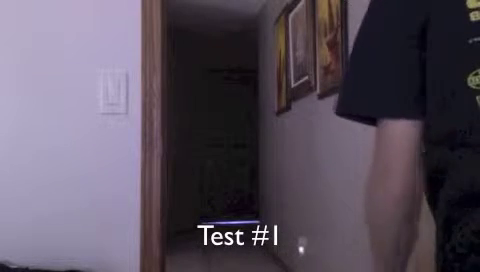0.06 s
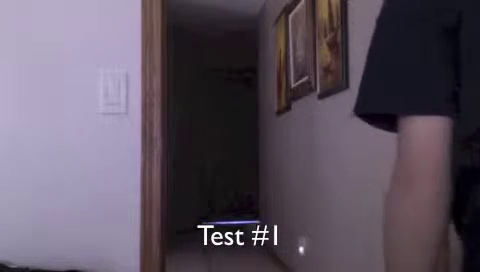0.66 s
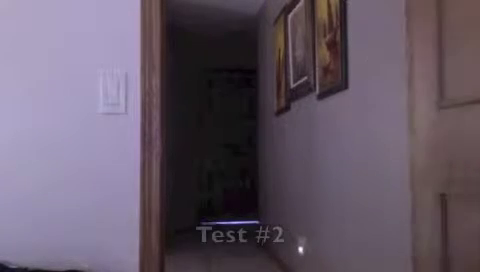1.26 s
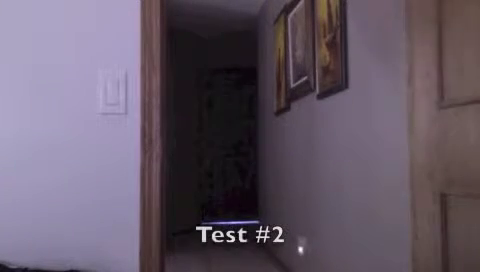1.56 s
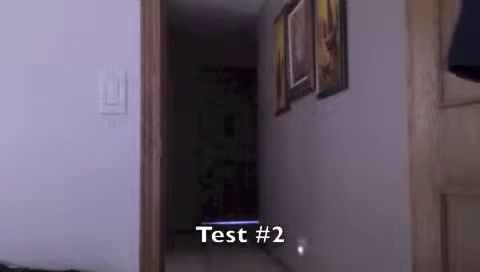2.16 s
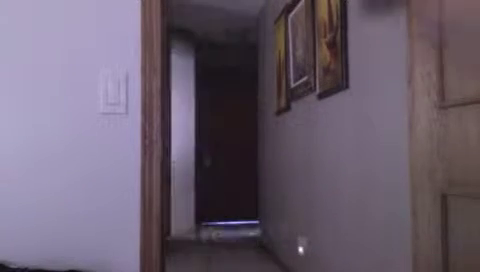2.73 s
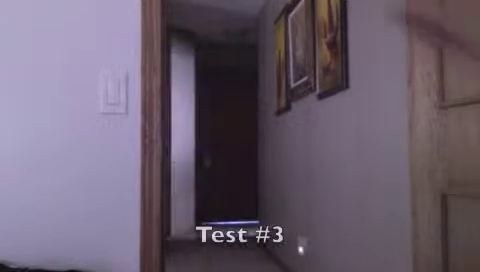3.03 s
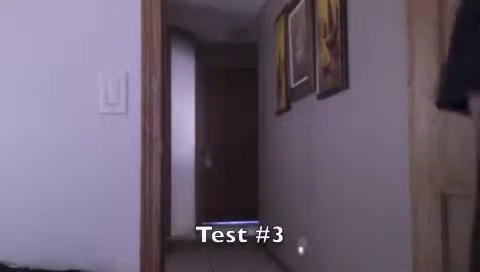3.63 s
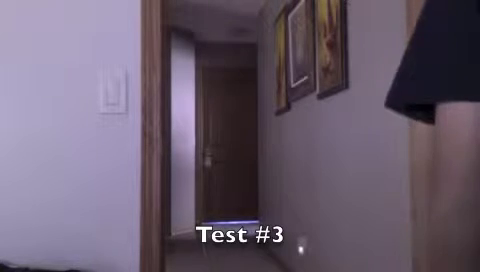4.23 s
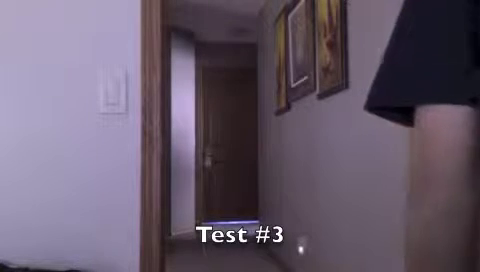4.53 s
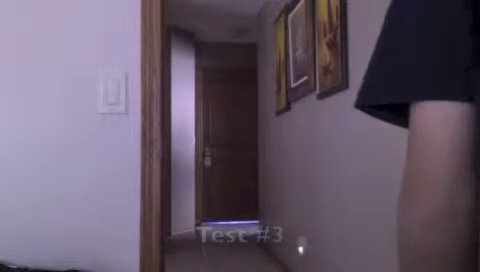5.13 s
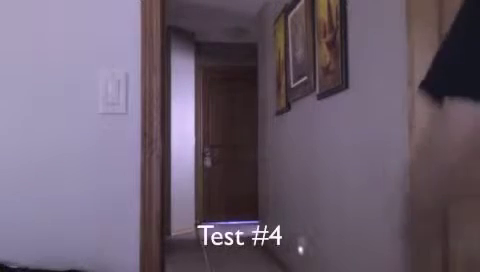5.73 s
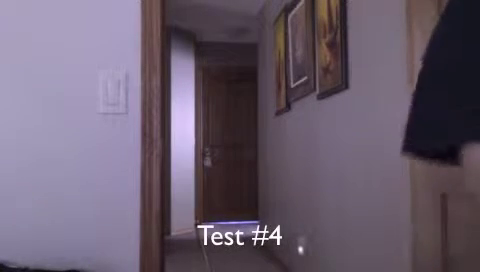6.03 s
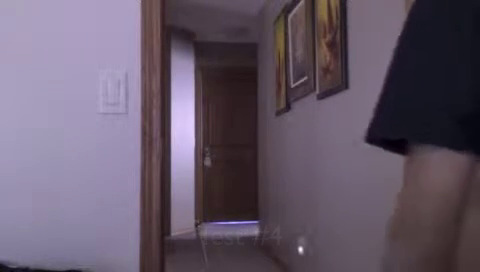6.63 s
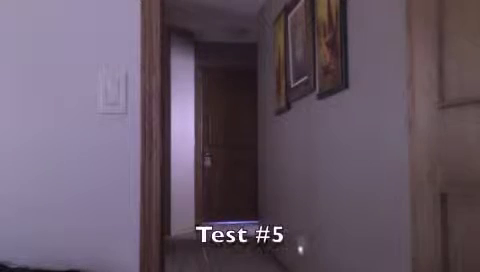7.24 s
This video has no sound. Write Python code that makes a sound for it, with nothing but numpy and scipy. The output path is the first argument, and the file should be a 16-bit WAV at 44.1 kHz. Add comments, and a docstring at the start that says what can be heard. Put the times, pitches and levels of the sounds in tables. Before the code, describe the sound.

Inside a house, a lightweight wooden glider lands with a quick patter of small clacks. Soft throwing swishes and low floor thumps come between further landings: a loud, sharp hit on wood, two brief raspy skids on the hard floor, and a final clack against a door. Each sound carries a short hallway echo, and the gaps hold only a faint, steady room hiss.

```python
"""A narrow hallway: test throws of a small wooden glider, in five short scenes that fade out and in.
The glider swishes off the hand, then skids on its thin wings in stick-slip grains or clacks on
hard surfaces, setting the door frame and panel ringing. Dull thumps come through the floor.
The hallway answers with close echoes and a half-second tail over a quiet hiss."""
import sys
import numpy as np
from scipy import signal
from scipy.fft import rfft, irfft
from scipy.io import wavfile
from scipy.ndimage import uniform_filter1d

SR = 44100
rng = np.random.default_rng(int(sys.argv[2]) if len(sys.argv) > 2 else 0)


def wav_record(signal):
    """Record a signal, one row per channel, as 16-bit PCM in the file named by sys.argv[1]."""
    frames = np.transpose(np.atleast_2d(signal))
    bounded = np.clip(frames, -1, 1)
    # unit amplitude maps onto the largest positive 16-bit level
    quanta = np.round(bounded * 32767).astype(np.int16)
    wavfile.write(sys.argv[1], SR, quanta)


N = 330309
SIZE = 32768  # samples per event
AGE_S = np.arange(SIZE) / SR


def undb(db):
    """Decibels to gain."""
    return 10 ** (np.asarray(db) / 20)


def unit(x):
    """Scale to unit energy."""
    return x / np.sqrt(np.sum(x ** 2) + 1e-18)


def per_bin(points, size):
    """Interpolate (frequency [Hz], value) points at every FFT bin, on a log axis."""
    hz, value = np.transpose(points)
    bins_hz = np.arange(size // 2 + 1) * SR / size
    return np.interp(np.log(bins_hz + 1), np.log(hz), value)


def through(x, response):
    """Convolve, cut to event length."""
    return signal.fftconvolve(x, response)[:SIZE]


def minimum_phase(gain):
    """Most compact impulse response with this spectral shape."""
    cepstrum = irfft(np.log(gain + 1e-12))
    cepstrum[1:SIZE // 2] *= 2
    cepstrum[SIZE // 2:] = 0
    return unit(irfft(np.exp(rfft(cepstrum))))


def colour(spectrum, tilt_db_oct=0):
    """Impulse response of a tilted spectrum table."""
    tilted = [(hz, db + tilt_db_oct * np.log2(hz)) for hz, db in spectrum]
    return minimum_phase(undb(per_bin(tilted, SIZE)))


def resonances(peaks, q):
    """Impulse response lifting damped resonances out of a flat spectrum."""
    bins_hz = np.arange(SIZE // 2 + 1) * SR / SIZE
    lift = sum(abs(undb(db) ** 2 - 1) / (1 + (2 * q * (bins_hz / hz - 1)) ** 2) for hz, db in peaks)
    return minimum_phase(np.sqrt(1 + lift))


def ringing(modes):
    """Damped sines, random phases."""
    return unit(sum(undb(db - 60 * AGE_S / t60_s) * np.sin(2 * np.pi * (hz * AGE_S + rng.random()))
                    for hz, db, t60_s in modes))


def whiten(x, width_bins):
    """Flatten the broad spectral humps of a burst."""
    power = uniform_filter1d(abs(rfft(x)) ** 2, width_bins)
    return unit(through(x, minimum_phase((power + 1e-12) ** -.5)))


def grains(envelope, spread_db):
    """Tiny contacts of uneven strength under an envelope."""
    noise = envelope * rng.standard_normal(SIZE)
    strength = undb(spread_db * np.minimum(rng.exponential(size=SIZE), 5))
    return unit(noise * strength)


def add(track, time_s, sound, level_db):
    """Mix in an event; level is its energy spread over 50 ms."""
    start = int(time_s * SR)
    scaled = unit(sound) * undb(level_db) * np.sqrt(SR / 20)
    part = scaled[max(-start, 0):N - start]
    start = max(start, 0)
    track[start:start + len(part)] += part


# (frequency [Hz], level [dB])
HISS_SPECTRUM = [(15, -40), (25, -30), (53, -1), (169, -4), (221, -14), (253, -12), (368, -14.5),
                 (457, -10.5), (582, -14.5), (919, -15.5), (1380, -18), (1750, -19), (3000, -20.5),
                 (3720, -24.5), (15500, -35.5)]


def hiss(rms_db=-53.5):
    """Steady hiss and rumble of the house."""
    noise = irfft(rfft(rng.standard_normal(N)) * undb(per_bin(HISS_SPECTRUM, N)), N)
    return unit(noise) * np.sqrt(N) * undb(rms_db)


# (frequency [Hz], t60 [s], level [dB])
TAIL_BANDS = [(100, 0.52, 2), (300, 0.51, 2.5), (700, 0.63, 2.5), (1890, 0.63, 4.5), (4000, 0.62, -4),
              (7160, 0.55, -9), (14000, 0.11, 5.5)]


def hallway_tail(t60_scale=1, build_s=.0026):
    """Diffuse reverberation; the top band dies first."""
    spectrum, tail = rfft(rng.standard_normal(SIZE)), 0
    for k, (_, t60_s, db) in enumerate(TAIL_BANDS):
        band = per_bin([(row[0], j == k) for j, row in enumerate(TAIL_BANDS)], SIZE)
        tail += irfft(spectrum * band) * undb(db - 60 * AGE_S / (t60_s * t60_scale))
    return unit(tail * (1 - np.exp(-AGE_S / build_s)))


# floor, walls and door: (delay [s], level [dB])
CLOSE_ECHOES = [(.0016, -4), (.0033, -4), (.0112, -7), (.0175, -11), (.0212, -9), (.0252, -9)]


def hallway(force, wet_db, t60_scale=1):
    """Direct sound, close echoes and tail of a broadband force, whitened."""
    early = np.zeros(SIZE)
    early[0] = 1
    for delay_s, db in CLOSE_ECHOES:
        early[int(delay_s * SR)] += undb(db)
    near = whiten(through(force, early), width_bins=601)
    tail = unit(through(force, hallway_tail(t60_scale)))
    return whiten(near + undb(wet_db) * tail, width_bins=261)


# low hallway modes: (frequency [Hz], level [dB], t60 [s])
BOOM_MODES = [(116, -8, .35), (139, -20, 1), (185.8, -17, 0.21), (217, -21, 0.56)]
# dull contact: (frequency [Hz], level [dB])
KNOCK = [(24, -42), (45, -27.5), (90, -12.5), (140, -2.5), (235, -4), (290, -13), (385, -10.5), (490, -8.5),
         (660, -32), (820, -19), (1200, -30.5), (2000, -36), (10000, -65), (15000, -74.5)]
# (time [s], level [dB], pitch [Hz])
FLOOR_THUMPS = [(.812, -29.5, 168), (1.207, -48, 167), (1.853, -35.5, 139), (1.965, -40, 148),
                (2.27, -35, 160), (2.609, -48.5, 153), (2.696, -55, 153), (4.476, -42, 203),
                (4.494, -38, 157), (4.846, -53, 179), (5.818, -39, 135), (6.247, -43.5, 161)]


def thump(hz, cycles=3, echo_s=.029):
    """The floor gives for a few cycles with a rough knock; the far wall echoes, the hallway booms."""
    push = np.sin(np.pi * np.minimum(AGE_S * hz / cycles, 1)) ** 2
    pulse = unit(push * np.sin(2 * np.pi * hz * AGE_S))
    echo = np.interp(AGE_S - echo_s, AGE_S, pulse, left=0)
    boom = unit(through(pulse, ringing(BOOM_MODES)))
    tail = unit(through(pulse, hallway_tail()))
    roughness = hallway(grains(push, spread_db=6), wet_db=-4.5)
    knock = unit(through(roughness, colour(KNOCK)))
    return pulse + undb(-6) * echo + undb(-8) * boom + undb(-11) * tail + undb(-13) * knock


SWISH_WIDTH_S = .0085
SWISH_PEAK_S = 3 * SWISH_WIDTH_S
# rubbed wood: (frequency [Hz], level [dB])
SWISH_SPECTRUM = [(400, -30.5), (880, -7.5), (1100, -2.5), (1400, -5.5), (2550, -3.5), (3300, -7),
                  (4400, -10.5), (5500, -10.5), (10000, -16.5), (15000, -16.5)]
# its resonances: (frequency [Hz], lift [dB])
SWISH_PEAKS = [(1100, 7), (2600, 10), (4390, 15), (6650, 6), (9030, 5), (10800, 5)]
# throws and light rustles: (peak time [s], level [dB])
SWISHES = [(1.446, -46), (3.231, -46), (5.456, -47.5), (6.443, -55.5), (6.6, -56), (6.678, -59.5),
           (6.766, -57.5)]


def swish():
    """A soft rub on the wood swells and fades; each grip shifts the resonances."""
    swell = np.exp(-.5 * ((AGE_S - SWISH_PEAK_S) / SWISH_WIDTH_S) ** 2)
    rub = grains(swell, spread_db=3)
    peaks = [(hz * (1 + .015 * rng.standard_normal()), db) for hz, db in SWISH_PEAKS]
    wood = through(colour(SWISH_SPECTRUM), resonances(peaks, q=20))
    return through(hallway(rub, wet_db=-6.5, t60_scale=.44), wood)


# parts of a skid: (frequency [Hz], level [dB])
WING_SPECTRUM = [(200, -30.5), (1000, -21), (1400, -12), (1750, -1.5), (2450, -0.5), (3100, -2.5),
                 (3700, -1), (5000, -7), (6300, -14.5), (7700, -20), (9300, -37.5), (15000, -52.5)]
FUSELAGE_SPECTRUM = [(30, -28), (70, -8), (160, 5), (220, -10), (300, -17.5), (410, -6.5), (470, -11.5),
                     (580, -1), (750, -15), (1150, -7), (2000, -34), (15000, -55)]
CRACKLE_SPECTRUM = [(1500, -37), (5000, 1), (8000, 10), (15000, -7.5)]
# wing resonances: (frequency [Hz], lift [dB])
WING_PEAKS = [(2200, 5.6), (2480, 5.5), (2890, 5.2), (3620, 1.9), (4450, 2.4), (5070, 4), (5700, 1.3),
              (7600, 6), (8950, 3.1), (10500, 7.1)]
# (time [s], level [dB], touch [s], tilt [dB/oct], crackle [dB], fuselage [dB], second wing [dB])
WING_LANDINGS = [(.699, -33.3, .03, -3.5, -19, -29, -14), (4.5646, -21.7, .027, .5, -21.5, -37.5, -4.3),
                 (5.8065, -17.7, .014, 5.5, -38, -14.5, -4.7), (6.131, -45.5, .008, -6.5, -30, -38, -16)]


def skid(touch_s, tilt_db_oct, crackle_db, fuselage_db, rise_share=.46):
    """Stick-slip grains rasp one wing and crackle; a steep landing also knocks the fuselage."""
    rise_s, fall_s = rise_share * touch_s, (1 - rise_share) * touch_s
    pressure = np.minimum(.18 + AGE_S / rise_s, 1) * np.exp(-np.maximum(AGE_S - rise_s, 0) / fall_s)
    slips = hallway(grains(pressure, spread_db=4.5), wet_db=-4.5, t60_scale=.67)
    wing = unit(through(colour(WING_SPECTRUM, tilt_db_oct), resonances(WING_PEAKS, q=21)))
    rasp = unit(through(slips, wing + undb(fuselage_db) * colour(FUSELAGE_SPECTRUM)))
    ticks = hallway(grains(pressure, spread_db=4), wet_db=-14)
    crackle = unit(through(ticks, colour(CRACKLE_SPECTRUM)))
    return rasp + undb(crackle_db) * crackle


# contact spectra: (frequency [Hz], level [dB])
NOSE = [(45, -31.5), (100, -22), (170, -4.5), (240, -7.5), (320, -6.5), (520, -5.5), (750, -2.5),
        (1300, -4.5), (1600, -3), (2600, -7), (4100, -5.5), (6000, -31), (9000, -36), (15000, -47)]
TUMBLE = [(59, -75), (100, -19), (217, -5), (375, -51), (399, -17), (660, 5.5), (718, -12), (797, 0.5),
          (1370, -27), (1880, -6.5), (2230, -25), (2800, -33), (3050, -19.5), (5150, -27.5), (15000, -47)]
EDGE = [(50, -19), (180, -9), (270, -4), (420, -4), (580, 2), (950, -1), (1450, -2.5), (2100, -3.5),
        (2550, -3), (3400, -8), (4300, -21.5), (5100, -23), (6200, -34), (15000, -45)]
TIP = [(100, -19.5), (330, -12.5), (600, 1), (1000, 3), (1400, -4), (2400, -5), (4200, -9), (5100, -14),
       (6000, -27), (7800, -21.5), (9500, -27.5), (15000, -30.5)]
# contact: spectrum
CONTACT_SPECTRA = {"nose": NOSE, "tumble": TUMBLE, "edge": EDGE, "tip": TIP, "knock": KNOCK}
# wooden door frame: (frequency [Hz], level [dB], t60 [s])
FRAME_MODES = [(501, -13, .6), (670, -4, .45), (710, -2, .45), (1082, -10, .45), (1571, 0, .35),
               (1861, -2, .65), (2220, -7, .5), (2264, -8, .45), (2490, -5, .5), (2589, -8, .5),
               (2704, -8, .42), (2857, -8, .45), (3830, -10, .45), (4551, -18, .45), (5096, -19, .42),
               (6648, -28, .45)]


def frame_ring(contact):
    """Door frame modes, weighted by the contact's spectrum relative to a blow on the nose."""
    shift_db = per_bin(CONTACT_SPECTRA[contact], SR) - per_bin(NOSE, SR)  # 1 Hz bins
    return ringing([(hz, db + shift_db[int(hz)], t60_s) for hz, db, t60_s in FRAME_MODES])


# door panel: (frequency [Hz], level [dB], t60 [s])
PANEL_MODES = [(1106, -9, .4), (1157, -5, .35), (1178, 0, .5), (1233, -7, .2)]
# contact: (snap lift [dB], frame ring re wet level [dB])
CONTACT_RINGS = {"nose": (3, -5), "tumble": (5, -8), "edge": (15.5, -13), "tip": (12.5, -4),
                 "knock": (-1, -25)}
# (time [s], level [dB], contact, chatter t60 about 7x this decay [ms], snap [Hz], wet [dB],
#  hits panel [0/1])
CLACKS = [(-.04, -37.5, "tip", 4, 1646, 6, 1), (.077, -34.5, "tip", 2.7, 4900, -3, 0),
          (.1827, -34, "edge", 4.4, 1650, -14, 0), (.2029, -27.7, "tip", 7, 2850, -9, 0),
          (.222, -29.5, "tumble", 19, 765, 0, 0), (1.8383, -25, "knock", 4.3, 1165, -4.5, 0),
          (2.2735, -57.5, "tip", 1.4, 3770, -8, 0), (3.5896, -14.3, "nose", 1.4, 740, -5, 0),
          (4.909, -49.5, "tip", 12, 1850, -3, 0), (7.2534, -36, "tip", 2.4, 3800, -1, 1),
          (7.272, -17.7, "edge", 2.5, 1150, -4.5, 1)]


def clack(contact, chatter_ms, snap_hz, wet_db, hits_panel):
    """A sharp blow and brief chatter of the loose wing; door frame and panel ring on."""
    snap_db, frame_db = CONTACT_RINGS[contact]
    force = undb(7) * grains(np.exp(-1000 * AGE_S / chatter_ms), spread_db=2.5)
    force[0] += 1  # the blow itself
    blow = unit(through(hallway(force, wet_db), struck_wood(contact, snap_hz, snap_db)))
    frame = undb(frame_db + wet_db) * frame_ring(contact)
    panel = undb(-6 if hits_panel else -28) * ringing(PANEL_MODES)  # struck or only shaken
    return blow + frame + panel


# damped frame resonances: (frequency [Hz], lift [dB])
FRAME_PEAKS = [(1570, 5.5), (1865, 3.5), (2490, 4.5), (2680, 5), (5450, 8.5), (6650, 9.5), (8150, 7.5),
               (9950, 6)]


def struck_wood(contact, snap_hz, snap_db):
    """Response of the wood; each spot brings out its own snapping resonance."""
    wood = through(colour(CONTACT_SPECTRA[contact]), resonances(FRAME_PEAKS, q=22))
    return through(wood, resonances([(snap_hz, snap_db)], q=29))


def scene():
    """Landings, throws and thumps over the hiss."""
    track = hiss()
    for time_s, db, *impact in CLACKS:
        add(track, time_s, clack(*impact), db)
    for time_s, db, touch_s, tilt_db_oct, crackle_db, fuselage_db, second_db in WING_LANDINGS:
        add(track, time_s, skid(touch_s, tilt_db_oct, crackle_db, fuselage_db), db)
        second_wing = skid(touch_s=.025, tilt_db_oct=-3.7, crackle_db=-33, fuselage_db=fuselage_db)
        add(track, time_s + .033, second_wing, db + second_db)
    for peak_s, db in SWISHES:
        add(track, peak_s - SWISH_PEAK_S, swish(), db)
    for time_s, db, hz in FLOOR_THUMPS:
        add(track, time_s, thump(hz), db)
    return track[None]


FADE_OUT_S, LOWPASS_HZ = .091, 15850
# (silence start [s], silence end [s], fade-in [s])
SCENE_BREAKS = [(1.284, 1.286, .094), (2.821, 2.888, .003), (5.357, 5.359, .091), (6.825, 6.901, .005)]


def record(dry):
    """Fade between scenes, clip at full scale, low-pass."""
    time_s = np.arange(N) / SR
    fader = np.ones(N)
    for start_s, end_s, fade_in_s in SCENE_BREAKS:
        fader *= np.interp(time_s, [start_s - FADE_OUT_S, start_s, end_s, end_s + fade_in_s], [1, 0, 0, 1])
    lowpass = signal.ellip(10, .2, 80, LOWPASS_HZ, fs=SR, output="sos")
    return signal.sosfilt(lowpass, np.clip(dry * fader, -1, 1))


dry = scene()
out = record(dry)
wav_record(out)
```